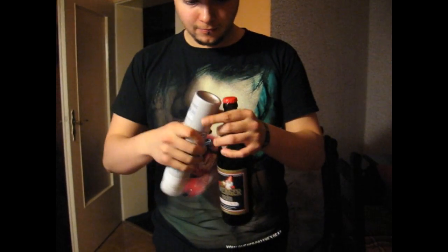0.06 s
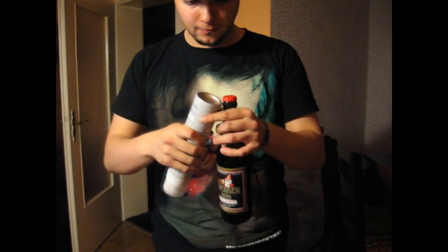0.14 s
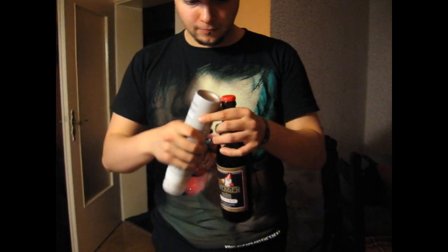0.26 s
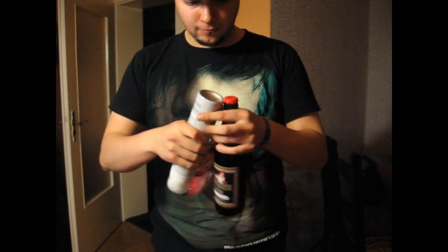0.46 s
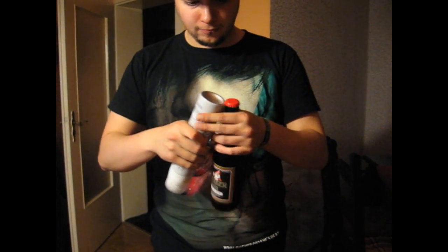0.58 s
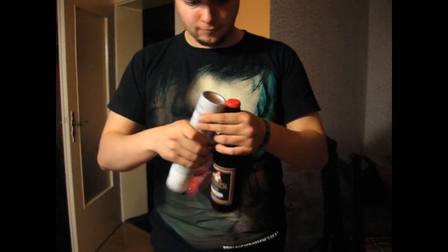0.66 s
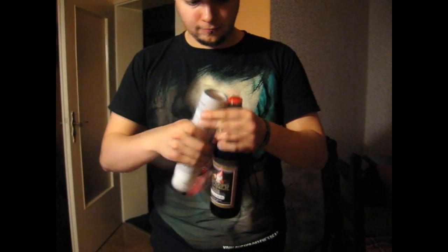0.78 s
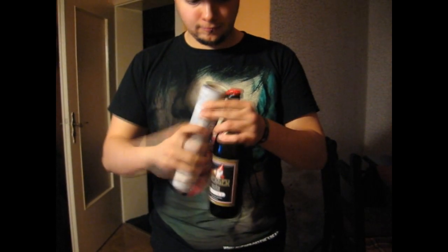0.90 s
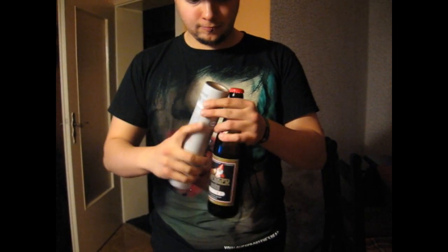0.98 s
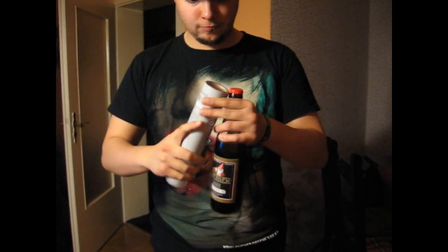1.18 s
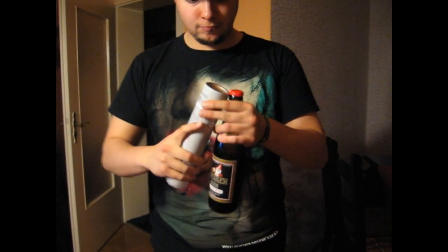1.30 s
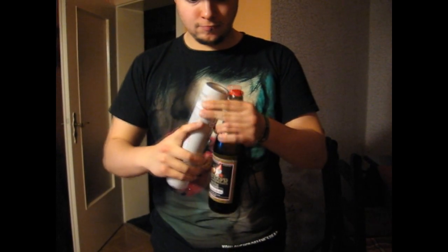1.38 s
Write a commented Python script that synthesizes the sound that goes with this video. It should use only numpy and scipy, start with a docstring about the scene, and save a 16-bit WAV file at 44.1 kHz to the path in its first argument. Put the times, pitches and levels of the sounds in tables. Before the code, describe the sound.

A hand-held can hits a glass bottle with one sharp, ringing clink, quickly followed by a hollow knock. After a soft rub comes another knock and a few faint taps, sounding close and grainy in a small room.

```python
"""A gritty hiss and a faint touch, then a drink can clinks brightly on a capped glass bottle.
Two hollow knocks of the can, more faint touches and a soft rub follow in the small, bare room.
Each impact excites damped modes: the glass rings high, the hand-held can lower.
An 8-bit recorder adds the grit by quantisation and mirrors the ringing into the treble."""
import sys
import numpy as np
from scipy import signal
from scipy.fft import rfft, irfft, next_fast_len
from scipy.io import wavfile

SR = 44100
rng = np.random.default_rng(int(sys.argv[2]) if len(sys.argv) > 2 else 0)


def wav_out(sig):
    """Save sig, one row per channel (or a flat mono array), as 16-bit PCM at SR to the path in sys.argv[1]."""
    wavfile.write(sys.argv[1], SR, np.round(np.clip(np.atleast_2d(sig).T, -1, 1) * 32767).astype(np.int16))


N = 63945


def amp(db):
    """Amplitude ratio of a level in decibels."""
    return 10 ** (np.asarray(db) / 20)


def along(points, hz):
    """Interpolation of (Hz, value) points on a logarithmic frequency axis."""
    freqs, values = np.transpose(points)
    return np.interp(np.log(hz + 1), np.log(freqs + 1), values)


def filtered(x, gain_db):
    """Minimum-phase filtering: folding the cepstrum makes the curve gain_db(hz) causal."""
    size = 2 * next_fast_len(len(x))
    gain = amp(gain_db(np.fft.rfftfreq(size, 1 / SR)))
    cepstrum = irfft(np.log(np.maximum(gain, 1e-6)))
    cepstrum[1:size // 2] *= 2
    cepstrum[size // 2 + 1:] = 0
    return irfft(rfft(x, size) * np.exp(rfft(cepstrum)))[:len(x)]


def noise(spectrum):
    """Spectral shaping of white noise, scaled to unit rms."""
    x = filtered(rng.standard_normal(N), lambda hz: along(spectrum, hz))
    return x / x.std()


# Room noise. Each row: frequency in Hz, relative spectral density in dB.
AIR_SPECTRUM = [(25, 0), (60, -6), (150, -8.5), (280, -4), (450, 2.5), (800, -3), (1600, -8.5),
                (3000, -8.5), (5000, -18)]
# Its envelope. Each row: time in seconds, level in dB.
AIR_LEVELS = [(0, -48.5), (.12, -50.5), (.66, -55.5), (.8, -59), (1.0, -48.5), (1.45, -54)]
def room_noise():
    """Amplitude modulation: the level of a quiet, coloured noise drifts slowly."""
    level_db = np.interp(np.arange(N) / SR, *np.transpose(AIR_LEVELS))
    return amp(level_db) * noise(AIR_SPECTRUM)


# Skin on glass. Each row: frequency in Hz, relative spectral density in dB.
RUB_SPECTRUM = [(300, -28), (1000, -14.5), (2000, 0.5), (3200, 0), (5000, -11.5)]
def finger_rub(peak_s=.84, width_s=.094, peak_db=-52.5):
    """Friction noise swells and fades as fingers shift on the bottle."""
    swell = np.exp(-.5 * ((np.arange(N) / SR - peak_s) / width_s) ** 2)
    return amp(peak_db) * swell * noise(RUB_SPECTRUM)


# Decay of the room. Each row: frequency in Hz, reverberation time (T60) in seconds.
REVERB_TIMES = [(150, 0.41), (400, 0.48), (1000, .58), (2000, .48), (4500, .38)]
# Colour of the reverberation. Each row: frequency in Hz, gain in dB.
REVERB_COLOUR = [(220, -3), (315, -10), (350, 2.5), (420, -1), (2000, 1.5), (4100, -2.5), (5200, -5.5)]
def in_room(rays, start_s, wet_db, first_echo_s=.012, early_db=-8.5):
    """Reverberation: sound radiated sideways adds a diffuse tail to the direct sound."""
    direct, sideways = rays
    freqs, frame_s, spectra = signal.stft(rng.standard_normal(SR), SR, nperseg=256)
    decay = amp(-60 * frame_s / along(REVERB_TIMES, freqs)[:, None])
    tail = signal.istft(spectra * decay, SR, nperseg=256)[1]
    t = np.arange(len(tail)) / SR
    tail *= amp(early_db * (t < first_echo_s))  # weaker until the walls answer
    tail = filtered(tail / np.linalg.norm(tail), lambda hz: along(REVERB_COLOUR, hz))
    out = amp(wet_db) * signal.fftconvolve(sideways, tail)
    out[:len(direct)] += direct
    return np.pad(out, (round(start_s * SR), N))[:N]


def gripped(rays, edge_hz, grip_db=-13, radiation_hz=150.3):
    """Absorption by the hand weakens the low ring; a small body also radiates little bass."""
    loss_db = lambda hz: grip_db / (1 + ((hz + 1) / (edge_hz * .88)) ** 16)
    bass_cut = signal.butter(2, radiation_hz, "high", fs=SR, output="sos")
    return signal.sosfilt(bass_cut, [filtered(ray, loss_db) for ray in rays])


# Contact noise. Each row: frequency in Hz, relative spectral density in dB.
CRACK_SPECTRUM = [(100, -27.5), (300, -22), (700, 2), (1500, 3), (3000, -0.5), (4100, -1), (5500, -8.5)]
def strike(modes, rebound_s, rebound_db, crack_db, attack_s, crack_t60_s=.0087):
    """Modal superposition: an impact and its rebound each excite damped sines and a noisy crack."""
    t = np.arange(SR // 2) / SR
    rays = np.zeros((2, len(t)))  # towards the microphone, sideways into the room
    for delay_s, contact_db in [(0, 0), (rebound_s, rebound_db)]:
        age = np.maximum(t - delay_s, 0)
        ring = np.zeros_like(rays)
        for hz, mode_db, t60, side_db in modes:
            scatter_db = rng.normal(0, 2)  # each contact shares its energy differently
            envelope = amp(mode_db + scatter_db - 60 * age / t60)
            ring += amp([[0], [side_db]]) * envelope * np.sin(2 * np.pi * hz * age)
        burst = amp(crack_db - 60 * age / crack_t60_s) * noise(CRACK_SPECTRUM)[:len(t)]
        crack = amp([[0], [-1]]) * burst  # slightly weaker sideways
        rays += amp(contact_db) * (ring + crack) * (1 - np.exp(-age / attack_s))
    return rays


# Modes of the can. Each row: frequency in Hz, level in dB, T60 in seconds, sideways gain in dB.
CAN_MODES = [(406.2, -11, 0.027, 0.5), (469.5, -11, .04, 1.5), (610.4, -0.5, 0.022, -6.5),
             (716.6, -14, .02, 1.5), (935.4, -9.5, .02, 2.5), (1118.5, -11, 0.019, -4.5),
             (1328, -11.5, 0.025, -1), (1597, -17, .035, 1), (1671, -17.5, .045, 6.5),
             (1754, -16, 0.041, 1.5), (1885, -7, 0.035, -5.5), (2260, -11, 0.018, -4.5),
             (2858, -11, 0.0078, -6.5), (3512, -15, 0.014, -4), (4560, -16.5, 0.031, 3.5)]
# Knocks and touches. Each row: start in seconds, level in dB, rebound delay in seconds,
# rebound gain in dB, edge in Hz below which the grip absorbs.
CAN_KNOCKS = [(.1655, -36, 0.0046, -8.5, 1024), (.3589, -14.5, 0.0023, -8.5, 334.4),
              (1.0342, -50.5, 0.00096, -10.5, 1440), (1.0479, -21, .0050, -2, 459.3),
              (1.171, -43, 0.0025, -2.5, 693), (1.2945, -48, 0.005, 3.5, 438),
              (1.4118, -44.5, 0.0016, -11, 457)]
def can_knocks():
    """Shell resonance: the can rings hollowly, and the grip sets how much low ring is left."""
    out = np.zeros(N)
    for start_s, db, rebound_s, rebound_db, grip_hz in CAN_KNOCKS:
        rays = strike(CAN_MODES, rebound_s, rebound_db, crack_db=-1.5, attack_s=.00022)
        out += amp(db) * in_room(gripped(rays, grip_hz), start_s, wet_db=.5)
    return out


# Modes of the bottle. Each row: frequency in Hz, level in dB, T60 in seconds, sideways gain in dB.
BOTTLE_MODES = [(862, -24.5, .033, 5.5), (1254, -31, 0.072, 6), (1460, -16.5, 0.014, 2.5),
                (1789, -22.5, .045, 5.5), (1850, -14.5, 0.038, 3), (2170, -14, 0.018, -0.5),
                (2291, -0.5, 0.012, -6), (2600, -7, 0.014, -3), (3026, -6, .016, -6.5),
                (3580, -15, 0.015, 7.5), (3903, -16.5, 0.052, 3), (4056, -17, .045, 5.5),
                (4980, -12.5, 0.035, -11.5)]
# The clink. Each row: start in seconds, level in dB, rebound delay in seconds, rebound gain in dB.
BOTTLE_CLINKS = [(0.2011, -10, .00224, -7.5)]
def bottle_clink(thump_db=-33, thump_s=.0021):
    """Impulse excitation: the can's rim rings the glass; the microphone overloads with a low thump."""
    out = np.zeros(N)
    for start_s, db, rebound_s, rebound_db in BOTTLE_CLINKS:
        rays = strike(BOTTLE_MODES, rebound_s, rebound_db, crack_db=1, attack_s=.0001)
        out += amp(db) * in_room(gripped(rays, edge_hz=450), start_s, wet_db=3.5)
        thump_age = np.maximum(np.arange(N) / SR - start_s, 0) / thump_s
        out -= amp(thump_db) * thump_age * np.exp(1 - thump_age)
    return out


def scene():
    """Linear superposition of all sources at one microphone."""
    return (bottle_clink() + can_knocks() + room_noise() + finger_rub())[None]


# Response after the converter. Each row: frequency in Hz, gain in dB.
RECORDER_RESPONSE = [(30, 0.5), (200, -2.5), (600, 0), (1000, 1.5), (2000, 2.5), (3000, 0.5), (4000, -1.5),
                     (5000, -4.5), (6000, -12), (7000, -24.5), (8000, -34.5), (9200, -50), (10200, -65.5)]
def record(dry, decimation=4, step=1 / 128, bias_steps=-.28, top_hz=10100):
    """Quantisation to 8 bits at a quarter of the rate; a gentle filter lets spectral images through."""
    slow = signal.resample_poly(dry[0], 1, decimation)
    quantised = step * np.round(slow / step + bias_steps)
    pulses = np.zeros(N)
    pulses[::decimation] = decimation * quantised  # the zeros between samples mirror the spectrum
    coloured = filtered(pulses, lambda hz: along(RECORDER_RESPONSE, hz))
    treble_cut = signal.butter(12, top_hz, fs=SR, output="sos")
    return signal.sosfilt(treble_cut, coloured)[None]


dry = scene()
out = record(dry)
wav_out(out)
```